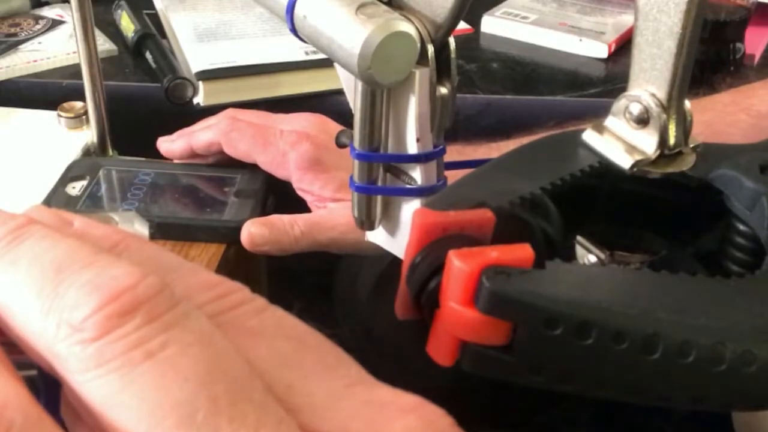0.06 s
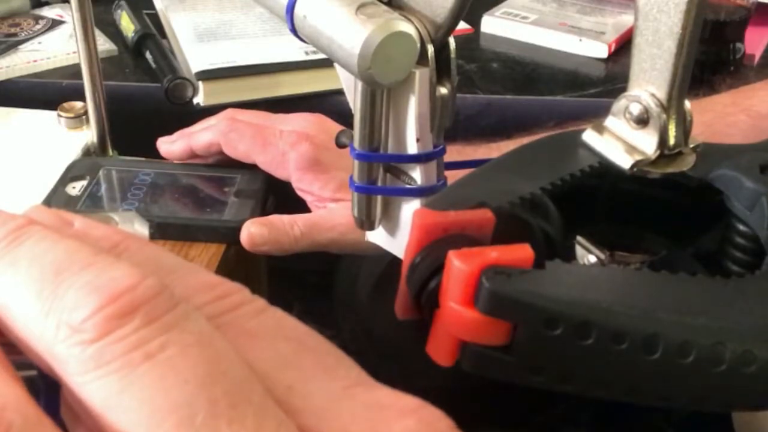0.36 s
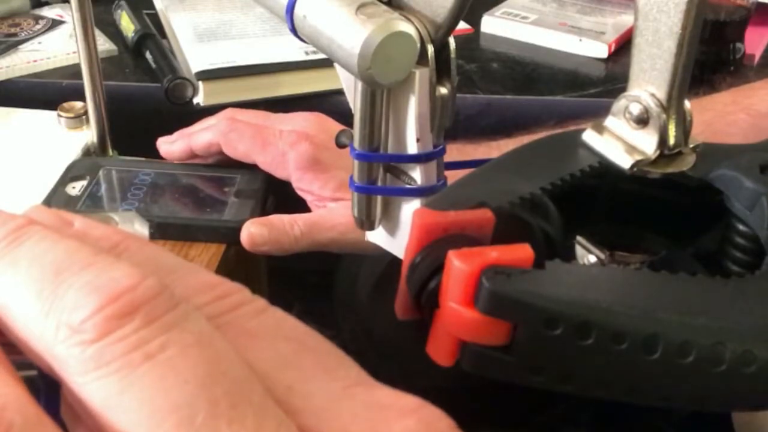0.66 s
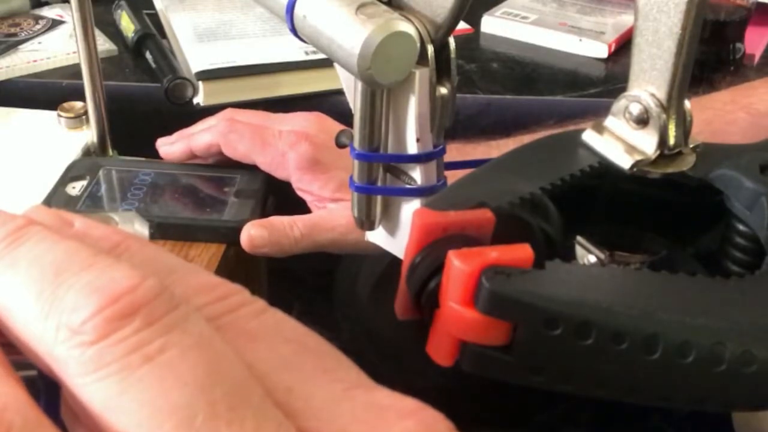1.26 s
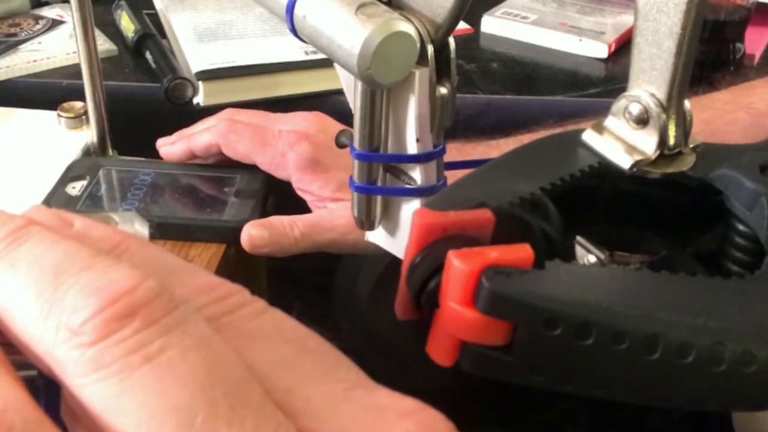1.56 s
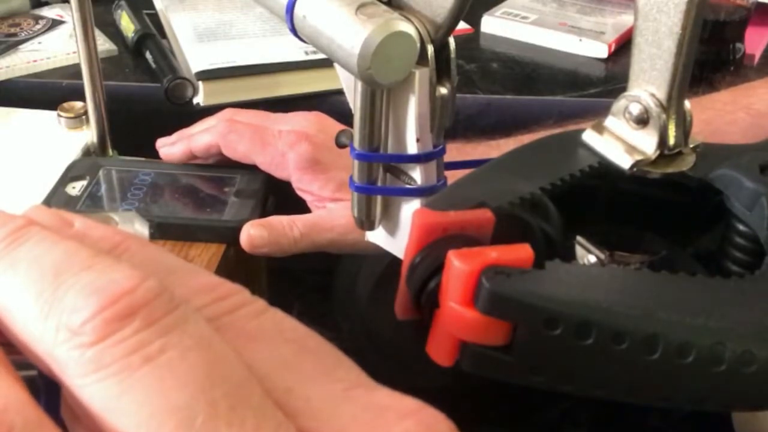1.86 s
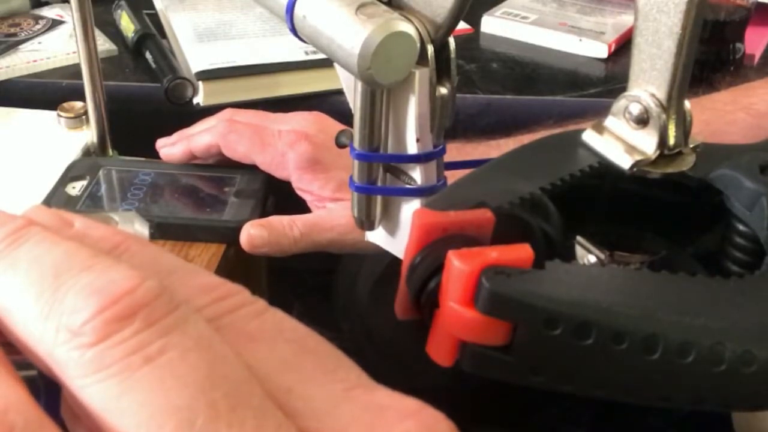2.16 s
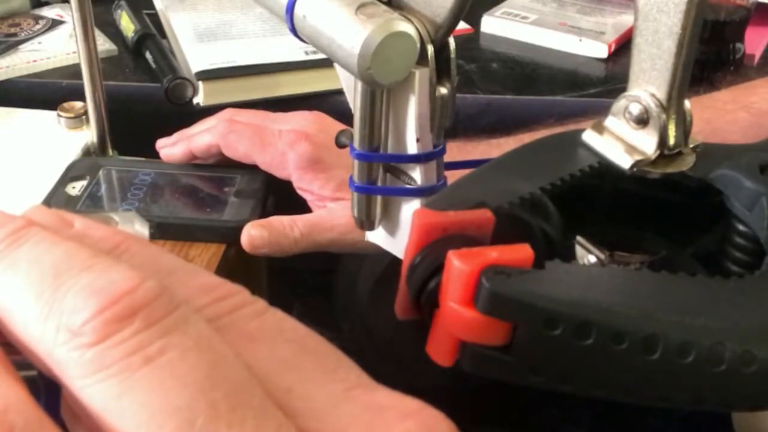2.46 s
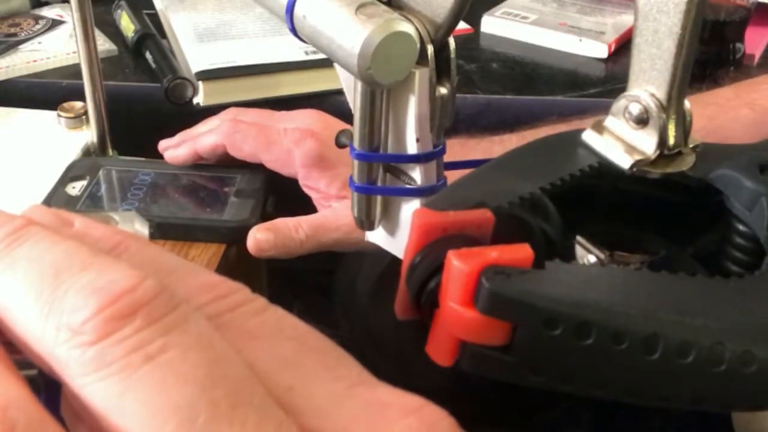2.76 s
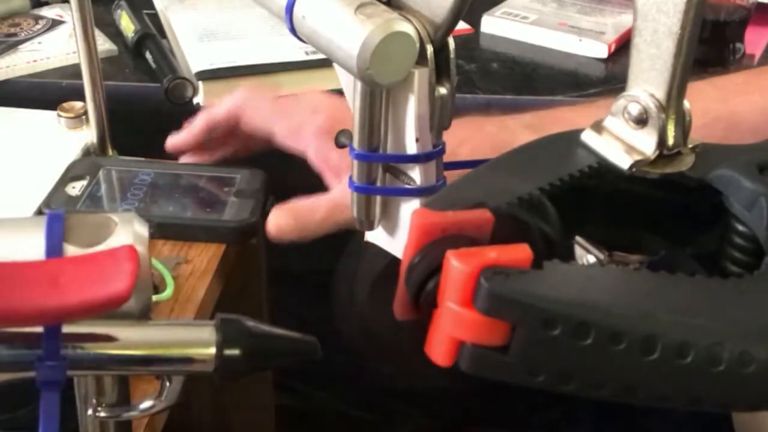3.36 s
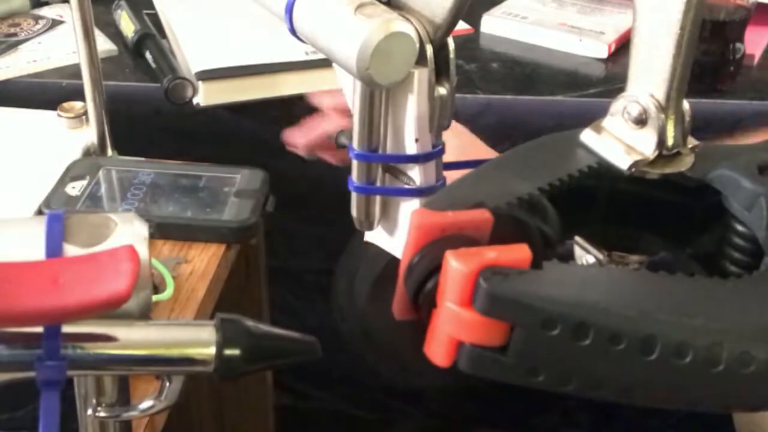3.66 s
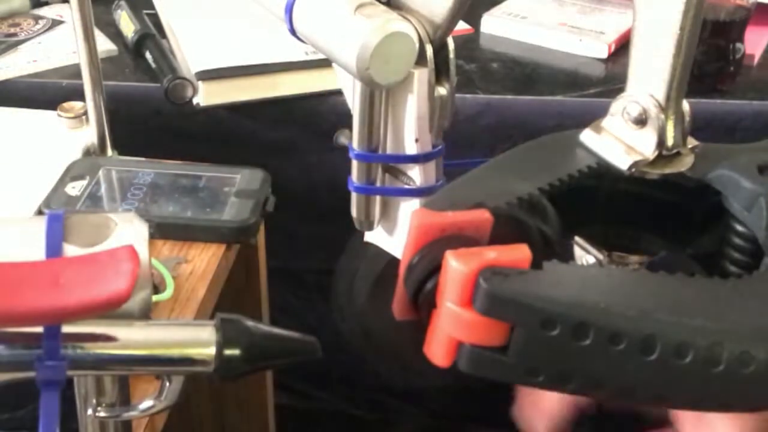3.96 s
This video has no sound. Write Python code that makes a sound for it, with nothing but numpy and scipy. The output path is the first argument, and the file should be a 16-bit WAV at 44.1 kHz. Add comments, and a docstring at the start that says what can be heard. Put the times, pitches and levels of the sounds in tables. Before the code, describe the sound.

Compressed air from a nozzle hisses against a metal spinner with a slowly rising, siren-like whine, close up on a workbench. The jet suddenly gets louder, then shuts off, and the spinner coasts with a quieter rattle and falling hum.

```python
"""An air gun, part open, blows on a three-armed metal spinner clamped over a workbench, close up. Each arm
chops the jet like a siren: a rising whine on pulsing hiss. At 1 s the gun opens fully; the sound jumps,
overshoots briefly, then slowly eases. Stray gusts thump the microphone. At 3.1 s the air is shut off. The
spinner coasts with a falling hum; its dry ball bearing rattles."""
import sys
import numpy as np
from scipy import signal
from scipy.fft import rfft, irfft
from scipy.io import wavfile

SR = 44100
rng = np.random.default_rng(int(sys.argv[2]) if len(sys.argv) > 2 else 0)


def pcm_store(signal):
    """Save signal as 16-bit PCM."""
    levels = np.round(np.clip(np.atleast_2d(signal), -1, 1) * 32767)
    wavfile.write(sys.argv[1], SR, levels.astype(np.int16).T)


N = 176400

# Arm passes under the jet: t/s, rate/Hz
ARM_RATE = [(0, 411), (.25, 419.4), (.5, 426.7), (.75, 433), (1, 438.2), (1.25, 442.7), (1.5, 446.1),
            (1.75, 448.7), (2, 450.6), (2.4, 452.4), (2.8, 452.8), (3.1, 452.6)]
# Whine partials: harmonic, part-open level/dB, slope/(dB/s), full-open level/dB, slope/(dB/s)
SIREN_PARTIALS = [(1, -31.5, 1.5, -35, -1), (2, -39.5, -3, -35, -1.9), (3, -33.5, -1.5, -31, 0),
                  (4, -37, 6.5, -30, 0.4), (5, -35.5, -1.5, -31.5, -3.5), (6, -50.5, 7, -42.5, -8),
                  (7, -38.5, -0.5, -34.5, -1.05), (8, -40, -3.5, -35.5, -1.5),
                  (9, -41.5, -3.5, -31.5, -0.7), (10, -45, -3, -45, 2), (11, -45, -8, -49, -32),
                  (12, -54, 8, -36.5, -1.5), (13, -48.5, 0.5, -39.5, -5), (14, -50, 8.5, -46.5, 2),
                  (19, -57, 12, -52, -6)]
# Peaks and dips from bench reflections: f/Hz, half width/Hz, gain/dB
BENCH_RESPONSE = [(1688, 11, 5.5), (1728, 11, -7.5), (1763, 27, 4.5), (2950, 25, -1), (3157, 17, 3.5),
                  (3315, 29, 1.5), (3400, 25, -4), (3484, 14, 8.5), (3725, 18, 6), (3760, 7.4, -10),
                  (3808, 13, 7.5), (3877, 31, 9), (3910, 14, -11), (3900, 9.5, -4), (4160, 70, -2.5),
                  (4300, 85, 10), (4416, 38, 9), (5340, 64, 2), (6240, 45, 4)]
# Jet spectrum, part open: f/Hz, relative level/dB
HISS_PART_SPECTRUM = [(18, -75), (30, -35.5), (369, -17.5), (420, -21), (492, -20), (767, -17.5),
                      (852, -19), (1170, -15), (1260, -18), (1360, -20.5), (1770, -15.5), (2360, -20.5),
                      (4910, -21.5), (8500, -18.5), (15500, -20)]
# Jet spectrum, fully open: f/Hz, relative level/dB
HISS_FULL_SPECTRUM = [(18, -64), (30, -35), (389, -15), (443, -12.5), (546, -16), (830, -14), (897, -11),
                      (970, -12), (1230, -12), (1330, -10), (1550, -14), (1770, -8), (2130, -14),
                      (2300, -13.5), (2550, -12.5), (3230, -13), (15500, -11)]
# Hiss peaks and dips: f/Hz, width/Hz, added gain
HISS_PEAKS = [(4070, 1200, 0.097), (4830, 320, -0.32), (5330, 560, 0.22), (7400, 650, -0.2),
              (10460, 760, -0.36), (13200, 1400, -0.063)]
# Gusts at the microphone: t/s, Gaussian sigma/s, level/dB
GUST_PULSES = [(1.184, .08, -48), (1.48, 0.029, -46), (1.953, .016, -44.5), (2.246, .016, -50)]
# Hum of the free arms: harmonic, level at 3.5 s/dB
HUM_PARTIALS = [(1, -44), (2, -54.5), (3, -62)]
# Heard level of the bearing rattle, swelling after the air stops: t/s, level/dB
RATTLE_ENVELOPE = [(3.12, -46.5), (3.2, -45), (3.33, -40), (3.49, -38), (3.52, -35.5), (3.56, -35.5),
                   (3.59, -32), (3.63, -34.5), (3.67, -32), (3.715, -36), (3.78, -34.5), (3.84, -34),
                   (3.93, -33.5), (4, -34)]
# Bearing rattle spectrum: f/Hz, relative level/dB
RATTLE_SPECTRUM = [(24, -82), (40, -44), (229, -20.5), (294, -19), (377, -14), (438, -21), (758, -15),
                   (903, -21.5), (1160, -15), (1280, -16), (1490, -15), (1770, -15.5), (2770, -9.5),
                   (3560, -15), (3930, -14.5), (6480, -23.5), (15500, -24)]
# Spinner and clamp resonances: f/Hz, width/Hz, added gain
METAL_MODES = [(830, 110, .7), (1500, 46, 1.2), (2370, 120, 0.78), (2740, 63, 0.91), (2850, 44, 1.2),
               (4060, 290, 1.2), (5450, 160, 1.2), (7260, 400, 0.55), (9000, 600, .6)]

ARMS, COAST_DECAY_PER_S = 3, .252
OPEN_S, OPEN_RISE_S = .995, .002
SHUT_S, SHUT_FALL_S = 3.096, .0128
SURGE_DECAY_S = .039


def undb(db):
    """dB to amplitude."""
    return 10 ** (np.asarray(db) / 20)


def unit(x):
    """Scale to rms 1."""
    return x / np.sqrt(np.mean(x ** 2))


def drift(cutoff_hz):
    """Low-passed noise, rms 1."""
    hz = np.fft.rfftfreq(N, 1 / SR)
    return unit(irfft(rfft(rng.standard_normal(N)) / (1 + (hz / cutoff_hz) ** 4), N))


def colour(x, spectrum, peaks=()):
    """Shape by (f/Hz, level/dB) points and resonances; rms 1."""
    hz = np.fft.rfftfreq(N, 1 / SR) + 1
    points_hz, points_db = np.array(spectrum).T
    gain = undb(np.interp(np.log(hz), np.log(points_hz), points_db))
    gain *= 1 + sum(lift / (1 + (2 * (hz - centre) / width) ** 2) for centre, width, lift in peaks)
    return unit(irfft(rfft(x) * gain, N))


def siren(t, phase, rate_hz, opened, open_for_s, surge_db=1.5, jitter_rad=.017):
    """Chopped jet: harmonics of the arm rate swell and fade as they climb through bench reflections."""
    phase = phase + jitter_rad * drift(47)
    hz = np.arange(0, SR / 2, 2)
    bench_db = sum(db * np.exp(-((hz - centre) / width) ** 2) for centre, width, db in BENCH_RESPONSE)
    lift_db = surge_db * np.exp(-open_for_s / SURGE_DECAY_S)
    whine = 0
    for k, part_db, part_slope, full_db, full_slope in SIREN_PARTIALS:
        db = (1 - opened) * (part_db + part_slope * t)
        db += opened * (full_db + full_slope * open_for_s + lift_db)
        waver_db = .1137 * min(k, 10) * drift(4.3)
        flutter_db = .69 * drift(25)
        db += waver_db + flutter_db + np.interp(k * rate_hz, hz, bench_db)
        offset_rad = rng.normal() * min(k / 6, 2)
        whine -= np.sqrt(2) * undb(db) * np.cos(k * phase + offset_rad)
    return whine


def hiss(phase, opened, open_for_s, part_db=-28.5, full_db=-23, surge_db=2, sag_db_per_s=2):
    """Jet turbulence, pulsing as each arm cuts through."""
    part = colour(rng.standard_normal(N), HISS_PART_SPECTRUM, HISS_PEAKS) * undb(part_db)
    part *= 1 + .053 * np.cos(phase)
    full = colour(rng.standard_normal(N), HISS_FULL_SPECTRUM, HISS_PEAKS)
    full *= 1 + .14 * np.cos(phase) + .13 * np.cos(2 * phase)
    full *= undb(full_db - sag_db_per_s * open_for_s + surge_db * np.exp(-open_for_s / SURGE_DECAY_S))
    flutter_db = .55 * drift(40)
    return ((1 - opened) * part + opened * full) * undb(flutter_db)


def noise_floor(level_db=-57.5):
    """Faint, steady background noise."""
    return undb(level_db) * colour(rng.standard_normal(N), [(30, -6), (200, -21), (1000, 3), (15000, -24)])


def room(x, t60_s=.12, wet_db=-15.5, gap_s=.003):
    """Short reflections of a cluttered workshop."""
    t = np.arange(SR // 2) / SR
    tail = rng.standard_normal(len(t)) * undb(-60 * t / t60_s) * (t > gap_s)
    return x + undb(wet_db) * signal.fftconvolve(x, tail / np.linalg.norm(tail))[:N]


def gusts(t):
    """Stray air thumps softly on the microphone."""
    swell = sum(undb(db) * np.exp(-((t - at_s) / sigma_s) ** 2 / 2) for at_s, sigma_s, db in GUST_PULSES)
    rumble = colour(rng.standard_normal(N), [(20, -25), (55, 0), (110, -9), (300, -30), (2000, -92)])
    return swell * rumble


def arm_hum(t, phase, rise_db_per_s=3):
    """The free arms hum at harmonics of the arm rate."""
    hum = sum(np.sqrt(2) * undb(db) * np.sin(k * phase) for k, db in HUM_PARTIALS)
    waver_db = .49 * drift(11)
    return hum * undb(rise_db_per_s * (t - 3.5) + waver_db)


def bearing_rattle(t, phase, depth=.17, cage_ratio=.27):
    """Dry balls chatter in their race, unevenly over each turn of spinner and cage; the metal rings."""
    turn_rad = phase / ARMS
    uneven = (1 + depth * np.cos(turn_rad)) * (1 + depth * np.cos(cage_ratio * turn_rad))
    chatter = rng.standard_normal(N) * uneven
    rough_db = drift(400) + .43 * drift(36)
    level_db = np.interp(t, *np.array(RATTLE_ENVELOPE).T)
    return colour(chatter * undb(rough_db), RATTLE_SPECTRUM, METAL_MODES) * undb(level_db)


def scene():
    """One speed drives siren, hiss, hum and rattle; two identical channels."""
    t = np.arange(N) / SR
    coast_s = np.maximum(t - SHUT_S - SHUT_FALL_S, 0)
    rate_hz = np.interp(t, *np.array(ARM_RATE).T) * np.exp(-COAST_DECAY_PER_S * coast_s)
    phase = 2 * np.pi * np.cumsum(rate_hz) / SR
    opened = np.clip((t - OPEN_S) / OPEN_RISE_S, 0, 1)  # 0 part open, 1 fully open
    open_for_s = np.maximum(t - OPEN_S, 0)
    air_on = 1 - np.clip((t - SHUT_S) / SHUT_FALL_S, 0, 1)
    jet = siren(t, phase, rate_hz, opened, open_for_s) + hiss(phase, opened, open_for_s)
    floor = noise_floor()
    coasting = arm_hum(t, phase) + bearing_rattle(t, phase)
    heard = room(air_on * jet + (1 - air_on) * coasting) + gusts(t) + floor
    return np.array([heard, heard])


def record(dry, low_hz=40, top_hz=15750):
    """Recorder band limits: gentle high-pass, steep low-pass."""
    thin = signal.sosfilt(signal.butter(2, low_hz, "high", fs=SR, output="sos"), dry)
    return signal.sosfilt(signal.ellip(12, .1, 80, top_hz, fs=SR, output="sos"), thin)


dry = scene()
out = record(dry)
pcm_store(out)
```